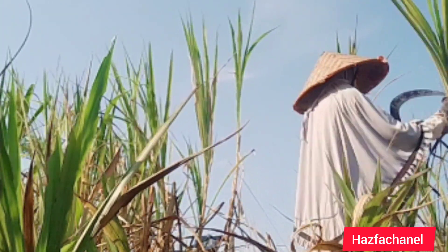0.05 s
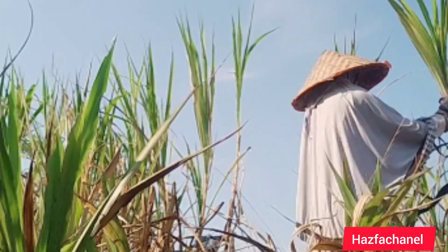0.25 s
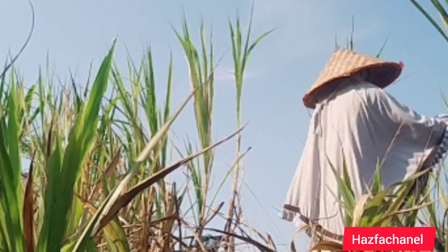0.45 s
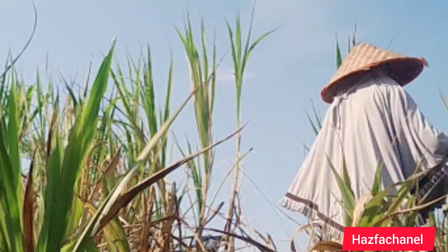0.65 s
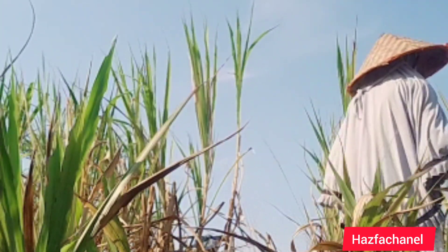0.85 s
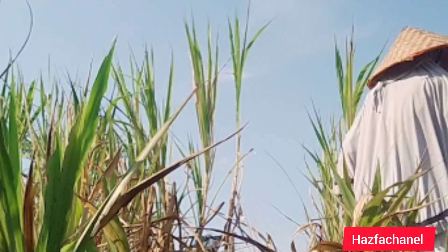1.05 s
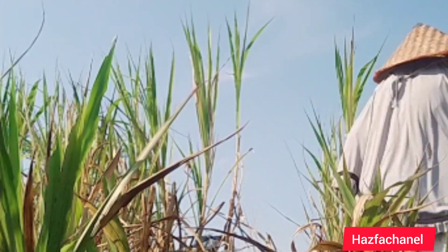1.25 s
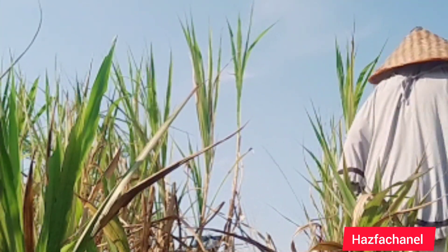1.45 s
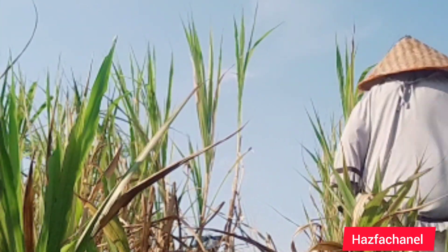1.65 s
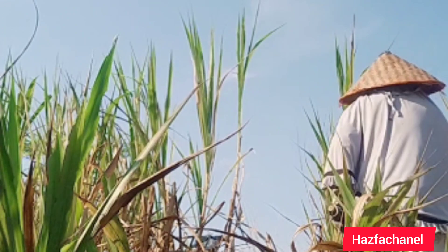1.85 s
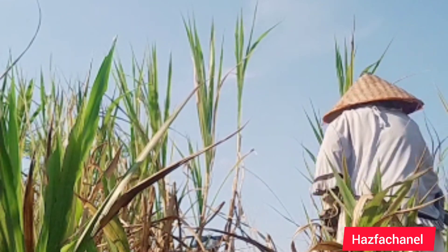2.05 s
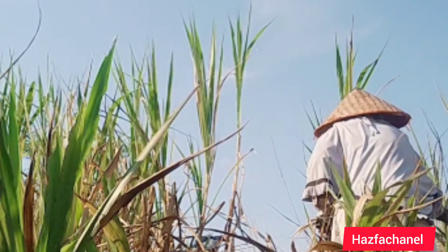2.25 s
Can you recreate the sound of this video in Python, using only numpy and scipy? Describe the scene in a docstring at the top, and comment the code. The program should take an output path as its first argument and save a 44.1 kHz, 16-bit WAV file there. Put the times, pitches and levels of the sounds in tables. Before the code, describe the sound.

A blade chops into tall cane-like grass with a crisp crack. Dry leaves rustle and scrape, small stems snap, and a softer second stroke follows. Faint wind rumbles low across the open field.

```python
"""Dry leaves rustle, then a blade chops into tall, cane-like grass; a softer second stroke follows.
Each impact excites the damped modes of the stalks and splits their fibres in a bright crackle.
As the bundle is pulled, friction makes the leaves scrape and swish, and brittle stems snap.
The open field scatters a faint echo of the cutting, over a low rumble of wind and a far hum."""
import sys
import numpy as np
from scipy import signal
from scipy.fft import rfft, irfft, next_fast_len
from scipy.io import wavfile

SR = 44100
rng = np.random.default_rng(int(sys.argv[2]) if len(sys.argv) > 2 else 0)


def store_pcm(level_fs):
    """Save levels as 16-bit WAV."""
    pcm = np.round(np.clip(level_fs, -1, 1) * 32767).astype(np.int16)
    wavfile.write(sys.argv[1], SR, np.atleast_2d(pcm).T)


N = 101429
TIME = np.arange(N) / SR

# blows of the blade: start_s, knock_db, pitch_hz, knock_decay_s, ring_db, rattle_db, rattle_decay_s
BLOWS = [(0.2091, -19.5, 780, 0.011, -33, -31.5, 0.032), (0.2228, -30, 814, 0.015, -44, -39, 0.035),
         (0.4475, -47, 766, 0.061, -57, -51, 0.035), (1.4542, -31.5, 536, 0.015, -52, -46.5, 0.071),
         (1.463, -35, 617, .012, -48, -54.5, 0.18)]
# modes of the struck stalks: pitch_hz, level_db, decay_s
STALK_MODES = [(520, -19, 0.096), (655, -12.5, 0.058), (970, -10.5, 0.036), (1605, -3, 0.036),
               (2090, 6.5, 0.0084)]
# dull spectrum of the clump: frequency_hz, relative_db
CLUMP_SPECTRUM = [(100, -32), (330, -21), (490, -1), (780, -1.5), (1100, -4), (1900, -18), (3000, -9),
                  (7000, -45)]
def chops(rise_s=0.00055):
    """Impact excitation: a blow knocks one stalk, rings its neighbours' modes and rattles the clump."""
    strikes, knocks, rattle = np.zeros((3, N))
    for start, knock_db, hz, knock_decay, ring_db, rattle_db, rattle_decay in BLOWS:
        knocks += amp(knock_db) * dying(start, 1 / hz, knock_decay) * sine(hz, start)
        strikes[int(start * SR)] = amp(ring_db)
        rattle += amp(rattle_db) * dying(start, rise_s, rattle_decay)
    modes = sum(amp(db) * dying(0, rise_s, decay) * sine(hz) for hz, db, decay in STALK_MODES)
    rattle *= crackle(per_s=5400, spread_db=2, clump_db=0, clump_hz=630)
    return knocks + signal.fftconvolve(strikes, modes)[:N] + colour(rattle, CLUMP_SPECTRUM)


# fibres splitting under the blade: start_s, length_s, level_db
SPLITS = [(0.2084, 0.0025, -28), (0.214, 0.013, -32), (0.2222, 0.012, -30), (0.237, 0.0093, -43),
          (0.263, 0.0024, -48), (1.4535, 0.015, -45.5)]
# their bright spectrum: frequency_hz, relative_db
SPLIT_SPECTRUM = [(600, -19), (2200, -14.5), (3000, -26), (3700, -7), (5900, -7.5), (8100, -6),
                  (10800, -14.5), (13500, -7.5), (14400, 1), (15000, 4), (16000, -12)]
def splits():
    """Acoustic emission: parting fibres release a dense train of clicks."""
    clicks = crackle(per_s=7000, spread_db=2.5, clump_db=0.5, clump_hz=1200)
    return colour(bursts(SPLITS, rise_s=0.0005, fall_s=0.0042) * clicks, SPLIT_SPECTRUM)


# stems and leaf ribs snapping: start_s, ring_db, pitch_hz, crack_db
SNAPS = [(0.1884, -43, 4480, -52), (0.2005, -38, 4600, -44), (0.2104, -31, 5200, -32),
         (0.2227, -14.5, 5740, -25), (0.2338, -20, 6500, -31), (0.248, -34, 7760, -33.5),
         (0.2663, -31, 8100, -39.5), (0.294, -32, 7400, -58), (0.83, -54, 7500, -48),
         (0.8989, -42, 7200, -60), (0.996, -40, 7460, -54), (1.0194, -45.5, 10200, -51),
         (1.099, -45, 11000, -56), (1.105, -39, 12600, -69), (1.1854, -39, 7160, -58),
         (1.217, -38, 9750, -53.5), (1.3952, -27.5, 7570, -38), (1.419, -43, 5370, -45),
         (1.433, -41, 5300, -41), (1.4405, -47, 7360, -45), (2.223, -44, 7740, -60),
         (2.254, -47, 5000, -62), (2.272, -45, 6500, -63)]
# spectrum of dry stems and litter breaking: frequency_hz, relative_db
BRITTLE_SPECTRUM = [(300, -10.5), (900, -5.5), (2600, -5), (4000, -4.5), (7500, 3), (10000, -10.5),
                    (16000, -5)]
def snaps(rise_s=0.0001, ring_decay_s=0.0055, tear_decay_s=0.022, crack_decay_s=0.013):
    """Brittle fracture: a broad crack, a brief ring and rough tearing around the same pitch."""
    rings, cracks = np.zeros((2, N))
    roughness = amp(-13.5) * drift(1400)  # modulation spreads the tone into a band
    for start, ring_db, hz, crack_db in SNAPS:
        tearing = roughness * dying(start, rise_s, tear_decay_s)
        rings += amp(ring_db) * (dying(start, rise_s, ring_decay_s) + tearing) * sine(hz, start)
        cracks += amp(crack_db) * dying(start, rise_s, crack_decay_s)
    return rings + colour(cracks * rng.standard_normal(N), BRITTLE_SPECTRUM)


# thin, high partials of the blade: pitch_hz, level_db
BLADE_PARTIALS = [(14900, -24), (15090, -35), (15515, -25)]
def blade():
    """Damped vibration: the slicing edge rings for a moment on the first stroke."""
    ring = sum(amp(db) * wavering(hz, depth_hz=45, rate_hz=200) for hz, db in BLADE_PARTIALS)
    return dying(start_s=0.227, rise_s=0.009, decay_s=0.091) * ring


# envelope of the moving bundle: time_s, level_db
RUSTLE_ENVELOPE = [(0, -55), (0.14, -53.5), (0.205, -44.5), (0.25, -40), (0.31, -44.5), (0.42, -50),
                   (0.47, -48), (0.55, -50), (0.63, -55.5), (0.81, -62.5), (0.87, -50), (0.96, -59.5),
                   (1.05, -54), (1.16, -61), (1.23, -55), (1.32, -50), (1.38, -50.5), (1.48, -44),
                   (1.55, -50.5), (1.64, -57), (1.79, -58.5), (1.9, -61), (2.02, -69), (2.13, -59),
                   (2.3, -58.5)]
# spectrum of dry leaves: frequency_hz, relative_db
LEAF_SPECTRUM = [(200, -31), (700, -19), (1400, -15.5), (2200, -20), (3000, -19), (3850, -14), (4700, -17),
                 (6500, -11), (7400, -4.5), (8100, -6.5), (8900, -13.5), (11300, -10.5), (13000, -4),
                 (14900, 3), (16000, 2)]
def rustle():
    """Superposition: thousands of small leaf clicks and ticks merge into a rustle."""
    clicks = crackle(per_s=12000, spread_db=4, clump_db=2.3, clump_hz=64)
    fibres = amp(-3) * ticks(per_s=4000, spread_db=2.5, decay_cycles=22)
    return colour(level(RUSTLE_ENVELOPE) * unit(clicks + fibres), LEAF_SPECTRUM)


# leaves scraping past one another: start_s, length_s, level_db
SCRAPES = [(0.071, 0.006, -48.5), (0.174, 0.0053, -43.5), (0.326, 0.0099, -39.5), (0.431, 0.044, -46),
           (0.446, 0.0049, -40), (0.876, 0.0053, -48), (0.893, 0.0053, -50), (0.91, 0.017, -50),
           (1.073, 0.0092, -47), (1.103, 0.006, -50.5), (1.213, 0.012, -51), (1.8, 0.0091, -55.5),
           (2.042, 0.021, -59.5)]
# their sharp spectrum: frequency_hz, relative_db
SCRAPE_SPECTRUM = [(200, -30), (2600, -16), (7600, -4.5), (10000, -9), (15000, 6.5)]
def scrapes():
    """Friction: saw-edged leaves rub in short bursts of clicks."""
    clicks = crackle(per_s=4500, spread_db=2, clump_db=2.5, clump_hz=580)
    fibres = ticks(per_s=2300, spread_db=4.5, decay_cycles=3.2)
    envelope = bursts(SCRAPES, rise_s=0.0014, fall_s=0.0026)
    return colour(envelope * unit(clicks + fibres), SCRAPE_SPECTRUM)


# dry litter crunching low in the stand: start_s, length_s, level_db
CRUNCHES = [(0.26, 0.072, -61), (0.86, 0.13, -69), (1.02, 0.046, -62.5), (1.069, 0.019, -57),
            (1.24, 0.0056, -57.5), (1.3935, 0.0092, -52.5), (1.417, 0.048, -58), (2.2, 0.075, -65)]
def crunches():
    """Crackling noise: dry litter gives way in clusters of tiny fractures."""
    clicks = crackle(per_s=2200, spread_db=-3.5, clump_db=4, clump_hz=410)
    fibres = amp(-4) * ticks(per_s=3800, spread_db=3.5, decay_cycles=3)
    envelope = bursts(CRUNCHES, rise_s=0.0037, fall_s=0.003)
    return colour(envelope * unit(clicks + fibres), BRITTLE_SPECTRUM)


# long leaves sliding edge on edge: start_s, length_s, level_db
SWISHES = [(0.29, 0.04, -57.5), (0.35, 0.11, -62.5), (0.53, .1, -68), (1.96, 0.019, -70),
           (2.115, .03, -73.5), (2.222, .012, -62.5)]
# hollow resonance of a leaf: frequency_hz, relative_db
SWISH_SPECTRUM = [(2700, -27), (3300, -16), (3700, -5), (4250, -11), (5000, -14), (16000, -36)]
def swishes():
    """Forced vibration: fine teeth on a sliding edge excite the leaf's resonance."""
    teeth = crackle(per_s=8000, spread_db=1, clump_db=2.8, clump_hz=120)
    return colour(bursts(SWISHES, rise_s=0.0037, fall_s=0.003) * teeth, SWISH_SPECTRUM)


# envelope of the stalks swaying after each cut: time_s, level_db
SWAY_ENVELOPE = [(0, -78), (0.2, -72), (0.29, -63.5), (0.47, -62.5), (0.58, -64), (0.7, -75.5), (1.38, -72),
                 (1.44, -61.5), (1.47, -56.5), (1.55, -65), (1.75, -70), (2.0, -78), (2.3, -105)]
def sway():
    """Contact noise: swaying stalks make a low swish with the clump's dull spectrum."""
    contacts = crackle(per_s=5400, spread_db=0, clump_db=2, clump_hz=33)
    return colour(level(SWAY_ENVELOPE) * contacts, CLUMP_SPECTRUM)


def field_echo(direct, echo_db=-22.5, reflections_per_s=3000):
    """Scattering: the surrounding stalks add weak reflections to the direct sound."""
    taps = rng.standard_normal(N) * (rng.random(N) < reflections_per_s / SR)
    taps *= dying(start_s=0.0014, rise_s=0.0031, decay_s=0.52)
    return direct + amp(echo_db) * signal.fftconvolve(direct, taps / np.linalg.norm(taps))[:N]


# spectra of the steady wind and of its gusts: frequency_hz, relative_db
WIND_SPECTRUM, GUST_SPECTRUM = [(20, -24), (40, 1), (60, 3.5), (125, 3), (145, -3), (185, -5), (280, -8.5),
                                (360, -9.5), (430, -16.5), (800, -21), (1600, -26), (4000, -26.5),
                                (10000, -34), (16000, -67)], [(20, -25), (55, -13.5), (78, 3.5), (110, -11), (200, -36.5),
                                             (16000, -78)]
# soft gusts: centre_s, half_length_s, level_db
GUSTS = [(0.478, 0.075, -57.5), (1.749, 0.016, -53.5)]
def wind(steady_db=-59):
    """Turbulence: moving air makes a low random rumble that swells in gusts."""
    steady = amp(steady_db) * colour(rng.standard_normal(N), WIND_SPECTRUM)
    swells = sum(amp(db) * np.exp(-((TIME - centre) / half) ** 2 / 2) for centre, half, db in GUSTS)
    return steady + swells * colour(rng.standard_normal(N), GUST_SPECTRUM)


# tones of the far hum: pitch_hz, level_db
HUM_TONES = [(122, -71), (188, -71), (346, -74)]
def hum(waver_db=3):
    """Random modulation: three low tones waver in level and pitch."""
    return sum(amp(db) * unit(amp(waver_db * drift(5.8)) * wavering(hz, depth_hz=4, rate_hz=9.55))
               for hz, db in HUM_TONES)


def amp(db):
    """Decibels to amplitude ratio."""
    return 10 ** (np.asarray(db) / 20)


def unit(x):
    """Normalisation to rms 1."""
    return x / np.sqrt(np.mean(x ** 2) + 1e-20)


def level(points):
    """Amplitude envelope through points of time_s, level_db."""
    return amp(np.interp(TIME, *np.transpose(points)))


def dying(start_s, rise_s, decay_s):
    """Exponential damping: a linear rise and a fall of 60 dB per decay time."""
    age = np.maximum(TIME - start_s, 0)
    return np.minimum(age / rise_s, 1) * np.exp(-np.log(1000) * age / decay_s)


def bursts(rows, rise_s, fall_s):
    """Incoherent addition: envelopes of attack, hold and release sum in power."""
    power = np.zeros(N)
    for start, length, db in rows:
        attack = np.clip((TIME - start) / rise_s, 0, 1)
        release = np.exp(-np.maximum(TIME - start - length, 0) / fall_s)
        power += (amp(db) * attack * release) ** 2
    return np.sqrt(power)


def sine(hz, start_s=0):
    """Simple harmonic motion with zero phase at the start."""
    return np.sin(2 * np.pi * hz * (TIME - start_s))


def wavering(hz, depth_hz, rate_hz):
    """Frequency modulation of a tone by a random drift."""
    return np.sin(2 * np.pi * np.cumsum(hz + depth_hz * drift(rate_hz)) / SR)


def drift(cutoff_hz):
    """Low-pass Gaussian noise of rms 1."""
    rolloff = 1 + (np.fft.rfftfreq(N, 1 / SR) / cutoff_hz) ** 4
    return unit(irfft(rfft(rng.standard_normal(N)) / rolloff, N))


def click_sizes(spread_db):
    """Amplitudes whose decibel levels follow a capped exponential distribution."""
    return amp(spread_db * np.minimum(rng.exponential(1, N), 4))


def crackle(per_s, spread_db, clump_db, clump_hz):
    """Shot noise: uneven random clicks, grouped into clumps by a drifting gain."""
    sizes = click_sizes(spread_db) * rng.choice([-1, 1], N)
    clicks = sizes * (rng.random(N) < per_s / SR)
    return unit(clicks * amp(clump_db * drift(clump_hz)))


def ticks(per_s, spread_db, decay_cycles, count=32):
    """Damped resonators: dry fibres tick at random, each at its own pitch."""
    out = np.zeros(N)
    for hz in np.linspace(1500, 15500, count):
        cycles = hz * rng.uniform(.96, 1.04) * TIME[:512]
        ring = unit(np.exp(-cycles / decay_cycles) * np.sin(2 * np.pi * cycles))
        impulses = click_sizes(spread_db) * (rng.random(N) < per_s / count / SR)
        out += signal.oaconvolve(impulses, ring)[:N]
    return unit(out)


def colour(x, spectrum):
    """Minimum-phase filter of unit power, shaped by the spectrum and cut 40 dB above 17 kHz."""
    size = 2 * next_fast_len(N)
    bins_hz = np.fft.rfftfreq(size, 1 / SR)
    hz, db = np.transpose(spectrum)
    shape = amp(np.interp(np.log(bins_hz + 1), np.log(hz), db))
    gain = unit(shape * (1e-2 + (bins_hz < 17000)))
    cepstrum = irfft(np.log(gain))
    cepstrum[1:size // 2] *= 2  # folding the cepstrum makes the filter causal
    cepstrum[size // 2 + 1:] = 0
    return irfft(rfft(x, size) * np.exp(rfft(cepstrum)))[:N]


def scene():
    """Superposition of the cutting with its echo, the foliage and the open air, in one channel."""
    cutting = field_echo(chops() + splits() + snaps() + blade())
    foliage = rustle() + scrapes() + crunches() + sway() + swishes()
    return (cutting + foliage + wind() + hum())[None]


def record(dry, cutoff_hz=15780):
    """Band limiting: a linear-phase low-pass removes the highest treble."""
    lowpass = signal.firwin(511, cutoff_hz, window=("kaiser", 8), fs=SR)
    return signal.oaconvolve(dry, lowpass[None], "same")


dry = scene()
out = record(dry)
store_pcm(out)
```